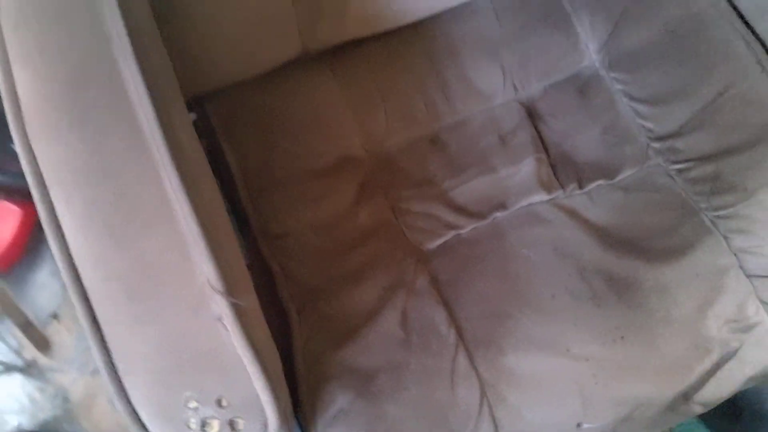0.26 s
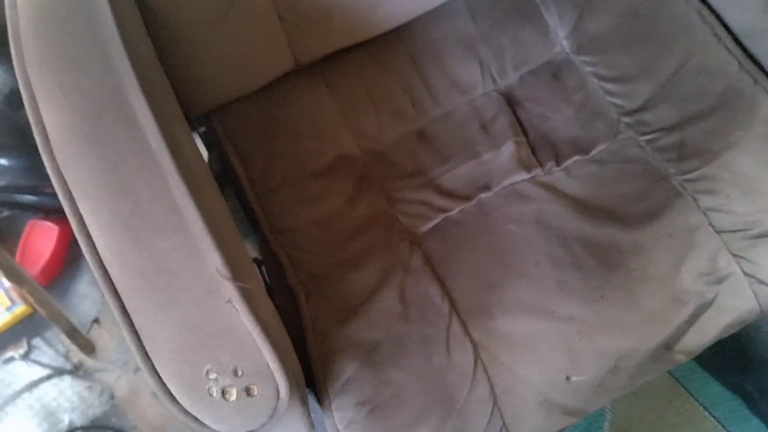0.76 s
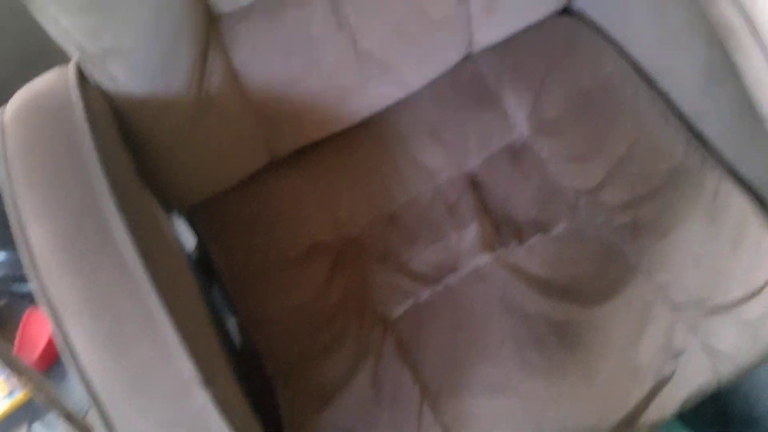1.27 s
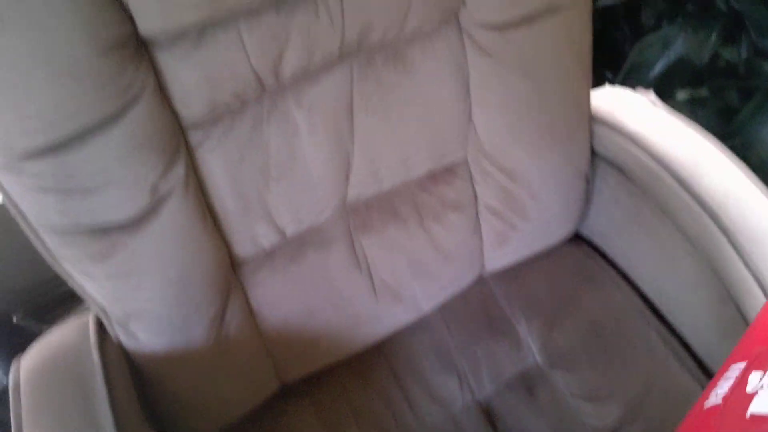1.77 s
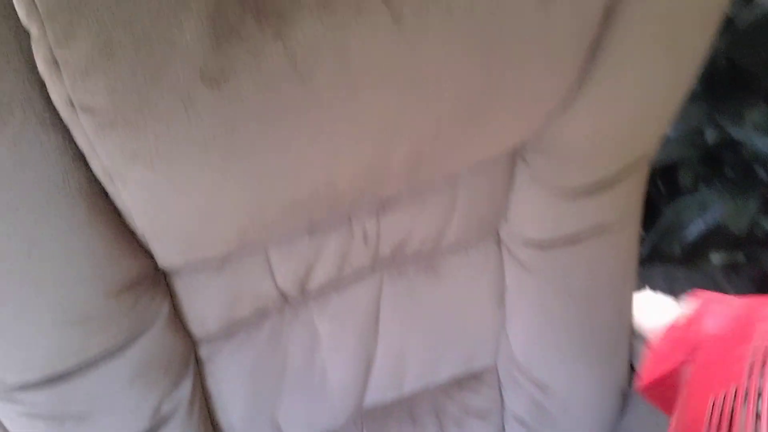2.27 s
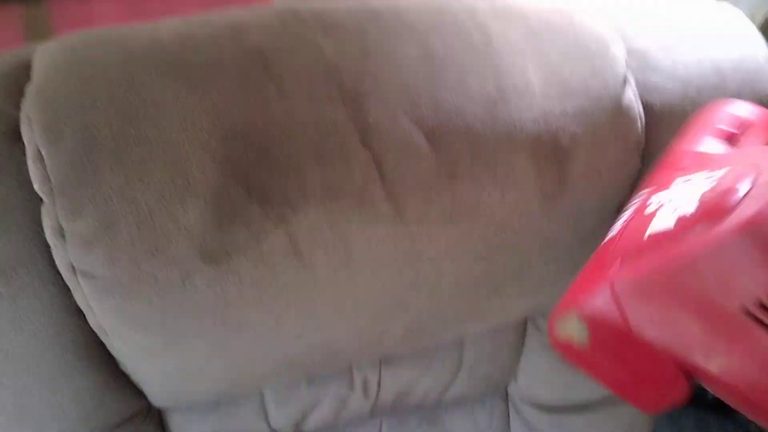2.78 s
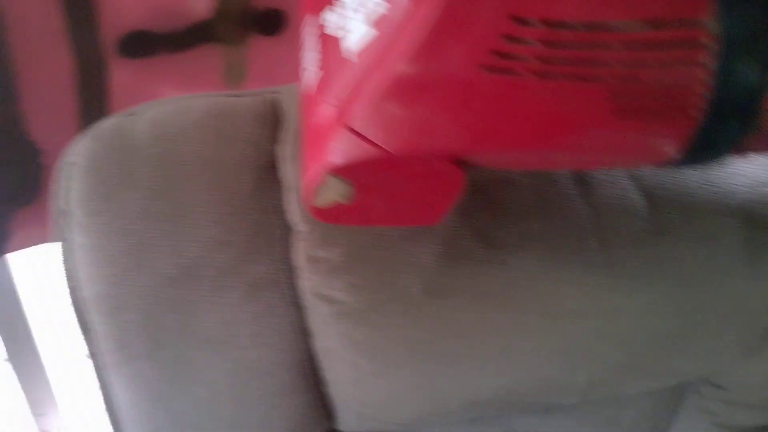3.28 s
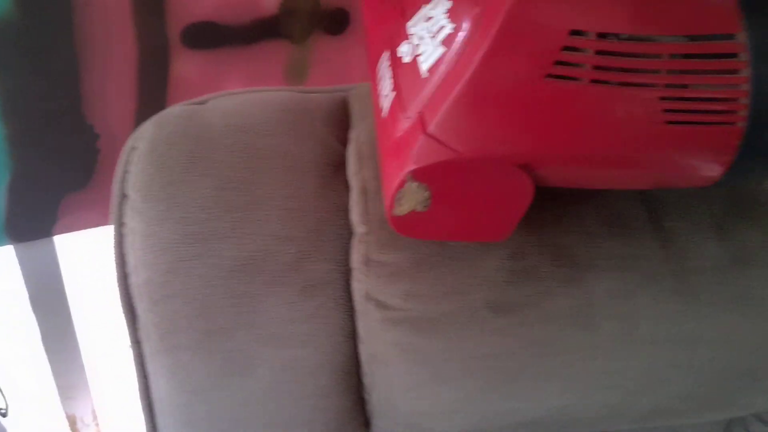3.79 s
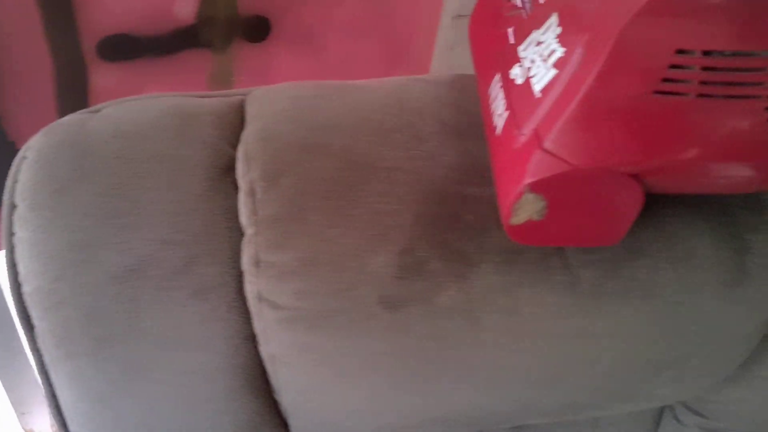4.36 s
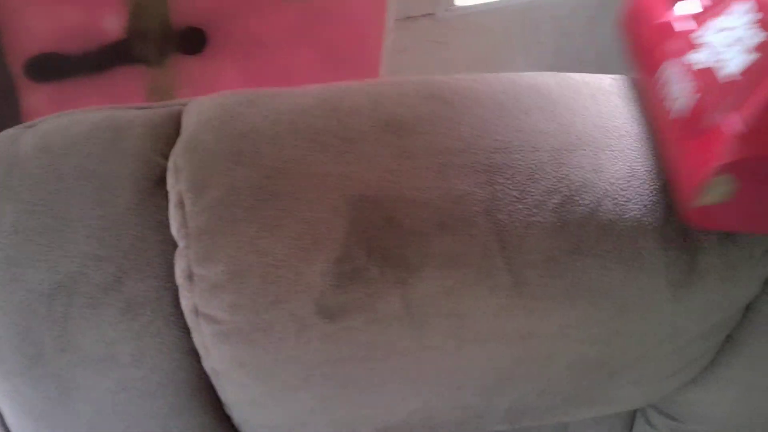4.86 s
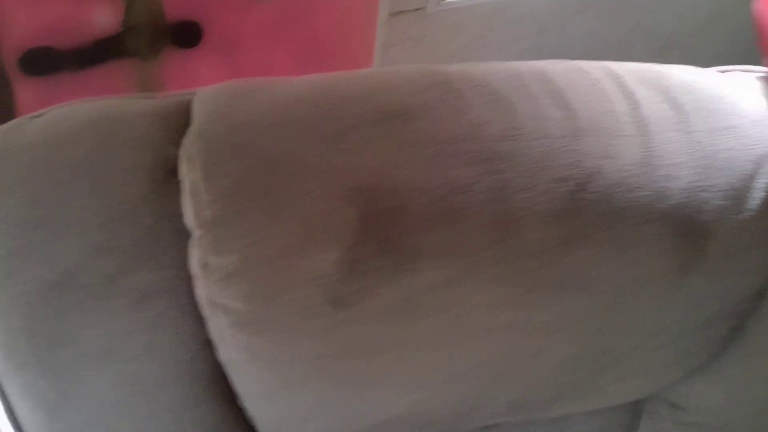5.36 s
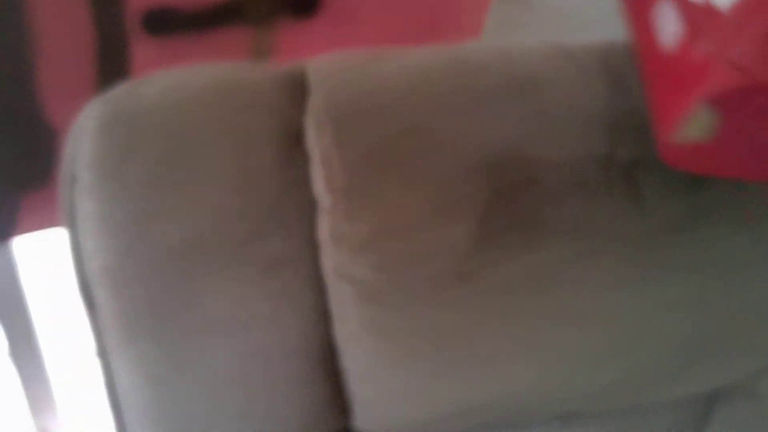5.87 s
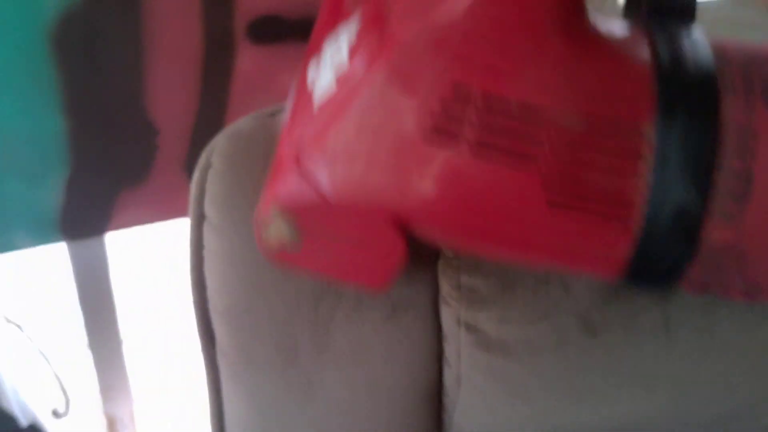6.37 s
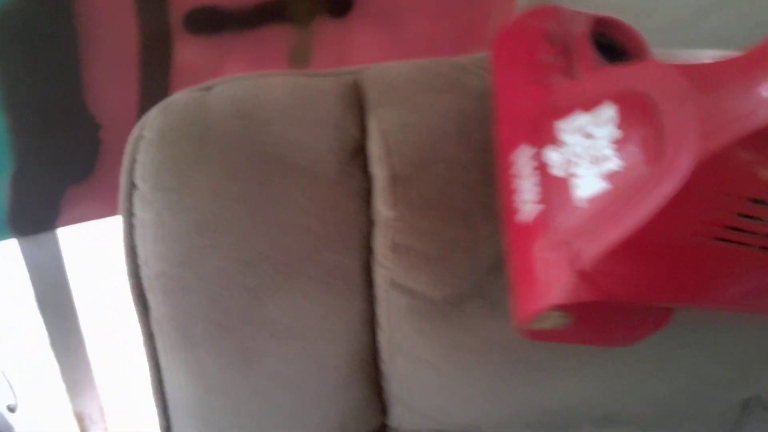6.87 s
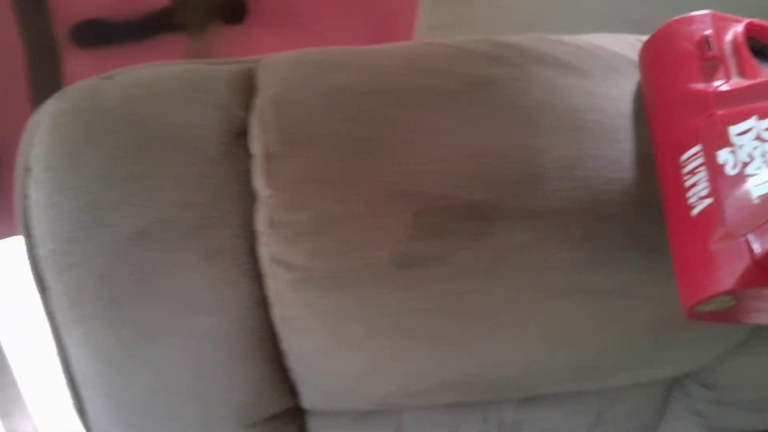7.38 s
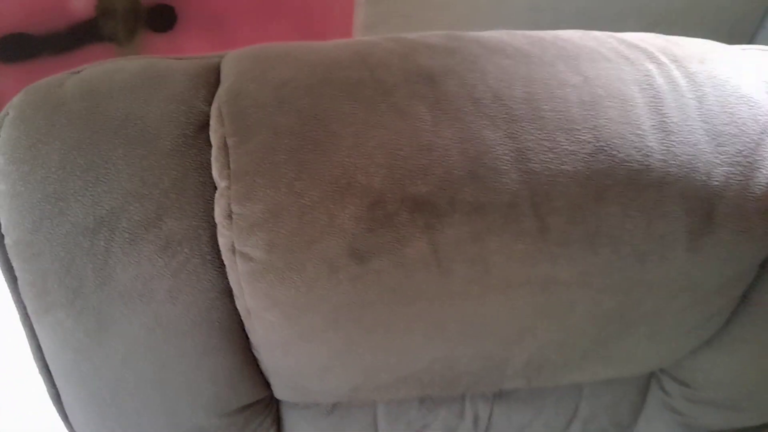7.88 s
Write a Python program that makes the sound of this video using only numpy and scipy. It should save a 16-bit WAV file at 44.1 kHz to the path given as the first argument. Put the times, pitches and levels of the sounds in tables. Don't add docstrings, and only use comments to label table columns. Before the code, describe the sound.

Close stereo sound of a little vacuum sweeping an upholstered chair. The steady high electric whine, with fainter motor tones around it, shimmers and drops out briefly as reflections change. Beneath are casing roar and suction, above them bright exhaust hiss. Faint hollow resonances glide early on; later the nozzle presses on padding, with muffled roar and a low frame rumble, until it recedes.

```python
import sys
import numpy as np
from scipy import signal
from scipy.io import wavfile
from scipy.ndimage import uniform_filter1d, map_coordinates

SR = 44100
rng = np.random.default_rng(int(sys.argv[2]) if len(sys.argv) > 2 else 0)


def nominal_scale(level):
    x = np.asarray(level, float) / 20
    return 10 ** x


def materialize(psi):
    bounded = np.clip(np.atleast_2d(psi).T, -1, 1)
    quanta = np.round(bounded * 32767).astype(np.int16)
    wavfile.write(sys.argv[1], SR, quanta)


N = 358974
TIME = np.arange(N) / SR
STEP = 64

# t/s, f/Hz
SHAFT_SPEED = [(0, 348.2), (.5, 349.2), (1.07, 349.85), (1.43, 349.25), (2.05, 349.7), (2.41, 349.2),
               (2.55, 350.05), (3.5, 349.55), (4.08, 348.1), (4.85, 348.3), (5.25, 346.7), (5.57, 348.5),
               (5.85, 346.9), (6.17, 348.3), (6.77, 348.6), (7.1, 347.75), (7.79, 347.65), (8.14, 346.9)]
# t/s, lead of the left microphone/samples, nearness/dB, nozzle opening/dB, cushion pressure/0-1
SWEEP = [(0, 6.2, 2.5, 5, 0.2), (.3, 10.2, -3.5, -4.5, .1), (.5, 15, -5.5, 0, 0),
         (.88, 17.3, -4.5, -1.3, .2), (1.43, 12.7, -4, 2.5, 0), (2.09, 10.7, -1.2, -1, 0.2),
         (2.5, 6.7, -0.2, -1, 0.2), (3, 11.8, 2.5, -2, 0.4), (3.48, 2.24, 2, 5, 0.68),
         (3.8, 4.83, 1.1, 2.5, .95), (4.75, 8.13, -0.2, -3.5, 0.93), (5.3, 15, -1.8, -2, 0.34),
         (6, 11.26, 0.5, 1.3, 0.84), (6.35, 2.53, 1.5, 2.5, 0.9), (6.52, 2.5, 1.5, -0.5, 0.84),
         (6.64, 5, 2, 2, .95), (7.15, 10.7, -0.5, -0.5, 0.68), (8.14, 13, -3.5, -4, 0.3)]
# t/s, left level/dB, right level/dB, extra lead by reflections/samples
WHINE = [(0, -32, -32, .8), (.22, -19.5, -22.5, 0.61), (.45, -20, -31, -0.2), (.9, -27, -28, -0.23),
         (1.27, -18, -30.5, -0.61), (1.74, -14.5, -33, 0.2), (2.21, -17.5, -22.5, 0.55),
         (2.7, -22, -22.5, 1), (2.86, -15.5, -29, .2), (3.4, -15.5, -24, -1.1), (4.13, -18, -23.5, -0.92),
         (4.61, -16.5, -25, -0.0047), (5.3, -17.5, -32.5, 0.02), (5.75, -20, -34.5, -0.47),
         (6.35, -17, -19.5, 0.12), (6.9, -16, -38, -0.67), (7.6, -23, -28, 1), (8.14, -33, -46, 0.52)]
# t/s, half length/s, left level/dB, right level/dB
WHINE_NULLS = [(.04, 0.034, -12, -14), (.35, 0.037, -8, -2), (.49, .04, 0, -5), (.67, 0.039, -6, -9),
               (.81, .03, -9, -4), (1.02, 0.036, -8, -1), (1.1, .04, 1, -5), (1.53, 0.14, -11.5, 0),
               (1.93, .12, -5.5, 0), (2.4, 0.085, -12, -11), (2.53, 0.053, -13, -1),
               (2.62, 0.046, -0.5, -20), (3, 0.063, -1, -24), (3.14, .06, -1, -8), (3.35, .03, 0.5, -5),
               (3.63, 0.14, -8, -14), (4.61, 0.14, 0.5, -8), (4.95, 0.027, 1, -2), (5.14, 0.11, -3, -18),
               (5.49, .05, -0.5, -15), (5.64, .05, -2.5, 2), (5.92, 0.035, -4, 2), (6.13, 0.068, -2, -3),
               (6.54, 0.075, -4.5, 7), (6.85, 0.033, -0.5, -13), (7.28, 0.11, -5, -11),
               (7.78, .05, -2, -10), (7.93, 0.075, 1, -14)]
# shaft multiple, left level/dB, right level/dB, scattered share
COMPANIONS = [(25, -28.5, -36.5, 0.36), (17, -32.5, -50.5, 0.3), (10, -36.5, -43.5, 0.093),
              (11, -39.5, -52.5, 0.36), (15, -42.5, -44.5, 0.34), (18, -41, -45.5, .3),
              (36, -40, -51, 0.51), (1, -51.5, -51, 0.15), (2, -53.5, -48, 0.21), (3, -49.5, -50, 0.46)]
STRONG_GLINTS = {25: [(.2, 0.18, -12, 9.5), (1, 0.17, -7, 3), (1.85, .2, -16, 3), (2.67, .25, -7, 10),
                 (3.3, 0.068, -7, 3), (5.35, 0.28, -4, 5), (6.3, 0.18, 2, 12), (7, 0.069, -25, -11),
                 (7.44, 0.08, -23, -10)], 17: [(.6, 0.55, -1, 3), (1.35, 0.22, 2.5, 16),
                 (1.9, 0.18, -2, -9), (2.6, 0.55, 1, 8), (5.6, 0.38, -8.5, -9), (7.25, 0.19, 0, 6),
                 (7.6, 0.27, -12, 12)]}
WEAK_GLINTS = {15: [(1.6, .5, -11, 4), (4.6, 0.42, 4, -4.5), (7, .6, 5.5, 4)], 18: [(1.7, 0.43, -3, 2),
               (6.6, 0.5, 5.5, -11)], 36: [(4.5, 1, -5, -10), (7.5, 0.45, 5, -2)],
               10: [(1.2, 0.24, -18, -11), (2.5, 0.29, -9, 9), (4.4, 0.38, 5, 3), (6.1, 0.075, 3, 11)],
               11: [(1.97, 0.17, 4.5, -7), (2.6, 0.12, -2, 16), (4.3, 0.78, -9, 15), (5.44, 0.41, -2, 4)],
               1: [(2.3, 0.65, 9.4, 6.8)], 2: [(2.2, 0.25, 13, 10.5), (3.03, 0.16, 3, -7),
               (6.3, 0.21, 3, 8)], 3: [(2.3, 0.19, -3, -3), (5.3, 0.1, -1, 8), (5.76, 0.17, 9, 9),
               (7.4, 0.36, -3, -22)]}
# shaft multiple, left level/dB, right level/dB
FAINT_ORDERS = [(5, -46, -48), (7, -50, -51), (8, -49, -49), (9, -47, -47), (12, -53, -55), (13, -52, -54),
                (14, -54, -56), (21, -51, -54), (22, -48, -52), (16, -47, -53), (20, -45, -47),
                (23, -44, -47), (24, -44, -47), (26, -43, -48), (28, -43, -53), (29, -37, -48),
                (30, -50, -58), (32, -48, -55), (33, -53, -59), (34, -50, -58), (37, -55, -62),
                (38, -64, -70)]
AIR_LAYERS = {"casing": (-39, 0.43, -1, 0.17), "nozzle": (-38, 1.04, -4, 0.34),
              "rush": (-30, 0.98, -1.5, 0.33), "hiss": (-27, 0.88, -1, .5)}
# f/Hz, level/dB
CASING_COLOUR = [(150, -42), (230, -13.5), (300, -3), (470, -0.5), (580, -3), (700, -9.5), (900, -58)]
# f/Hz, level/dB
NOZZLE_COLOUR = [(400, -67), (560, -13.5), (680, 2.5), (880, 5), (1000, 1.5), (1150, -4.5), (1350, -9),
                 (1600, -54)]
# f/Hz, level/dB
RUSH_COLOUR = [(800, -59), (1050, -10), (1250, -2), (1550, 0), (1900, -1.5), (2200, -0.5), (2900, -3.5),
               (3600, -1), (4700, -4), (5500, -3), (6300, -4.5), (7000, -11), (8500, -50)]
# f/Hz, level/dB
HISS_COLOUR = [(5000, -60), (6300, -14), (7000, -7), (7900, -3), (8800, 0), (9500, 0), (10200, -4),
               (10900, -11), (11600, -17), (12500, -21), (14300, -27), (16000, -45)]
MUFFLE_DB = [-3.5, -7.5]
# f/Hz, level/dB
CHAIR_COLOUR = [(30, -30), (60, -23), (90, -8), (125, -2), (200, 1), (260, -1), (340, -29)]
# f/Hz, level/dB
HANDLING_COLOUR = [(4, 19), (15, -2), (28, -27), (60, -27), (120, -50)]
# t/s, half length/s, f/Hz, glide/Hz per s, level/dB
HOLLOWS = [
    (0.87, 0.55, 950, -80.5, -36.5),
    (1.5, 0.32, 520, 26.5, -41.5),
    (2.3, 0.2, 860, -41, -40),
    (0.3, 0.16, 460, -50, -42.5),
    (7.3, 0.32, 150, 5, -55),
]


def unit(x):
    return x / np.sqrt(np.mean(x ** 2, axis=-1, keepdims=True) + 1e-20)


def curves(rows):
    s, *columns = np.transpose(rows)
    return np.array([np.interp(TIME, s, column) for column in columns])


def bumps(rows):
    s, half, *db = np.transpose(rows)
    coarse = TIME[::STEP]
    bells = np.exp(-((coarse - s[:, None]) / half[:, None]) ** 2)
    return np.array([np.interp(TIME, coarse, row) for row in db @ bells])


def wobble(rate, count):
    at = np.arange(N // STEP + 1) * STEP * rate / SR
    knots = rng.standard_normal((count, int(N * rate / SR) + 4))
    smooth = [map_coordinates(row, [at], np.float32) for row in knots]
    return np.repeat(smooth, STEP, axis=1)[:, :N]


def coloured(points, patchy_db, channels):
    noise = rng.standard_normal((channels, N), dtype=np.float32)
    hz, _, z = signal.stft(noise, SR, nperseg=2048)
    patches = uniform_filter1d(rng.standard_normal(z.shape[1:]), 9, 0)
    patches = uniform_filter1d(patches, 16, 1)
    f, db = np.transpose(points)
    colour_db = np.interp(np.log(hz + 1), np.log(f + 1), db, right=-120)
    gain = nominal_scale(colour_db[:, None] + patchy_db * patches / patches.std())
    return unit(signal.istft(z * gain, SR, nperseg=2048)[1][:, :N])


def late(x, samples):
    return map_coordinates(x, [np.arange(N) - samples], order=3, mode="mirror")


def motor(shaft_hz, lead, near_db):
    turns = np.cumsum(shaft_hz + 0.046 * wobble(30, count=1)[0]) / SR
    turns_per_sample = (shaft_hz / SR).astype(np.float32)

    def tone(multiple, level_db, fade, rate, lead=lead.astype(np.float32)):
        left = ((multiple * turns + rng.random()) % 1).astype(np.float32)
        right = left - multiple * turns_per_sample * lead
        angle = np.float32(2 * np.pi) * np.array([left, right], np.float32)
        scatter = np.float32(fade) * wobble(rate, count=4)
        swaying = (1 + scatter[:2]) * np.cos(angle) + scatter[2:] * np.sin(angle)
        return np.float32(np.sqrt(2) * nominal_scale(level_db)) * swaying

    *whine_db, detour = curves(WHINE)
    sound = tone(27, whine_db + bumps(WHINE_NULLS) + 0.5, 0.17, 11, lead + detour)
    glints = {**STRONG_GLINTS, **WEAK_GLINTS}
    for multiple, left_db, right_db, fade in COMPANIONS:
        level_db = np.array([[left_db], [right_db]]) + 0.54 * near_db + bumps(glints[round(multiple)])
        sound += tone(round(multiple), level_db, fade, 11)
    for multiple, left_db, right_db in FAINT_ORDERS:
        lift_db = 0.7 * max(multiple - 29, 0) - 0.3
        sound += tone(round(multiple), [[left_db + lift_db], [right_db + lift_db]], 0.45, 6)
    return sound


def air(points, level_db, lead, direct, bounce, patchy_db):
    source, left_room, right_room = coloured(points, patchy_db, channels=3)
    echo = bounce * np.array([np.roll(source, 130), np.roll(source, 122)])
    straight = np.array([source, late(source, lead)])
    room = np.array([left_room, right_room])
    return nominal_scale(level_db) * unit(np.sqrt(direct) * (straight + echo) + np.sqrt(1 - direct) * room)


def shaded(x, pressure):
    band_filter = signal.butter(2, [3300, 4900], "band", fs=SR, output="sos")
    band = signal.sosfiltfilt(band_filter, x)
    return x + (nominal_scale(-6.5 * pressure) - 1) * band


def airflow(lead, near_db, open_db, pressure):
    def ports(name):
        db, share, centre_db, lean_db = AIR_LAYERS[name]
        return db + share * near_db + np.outer([0.5, -0.5], centre_db + lean_db * lead)

    nozzle_lead = 1.22 * lead - 6
    casing_db = ports("casing") + np.outer(MUFFLE_DB, pressure)
    casing = air(CASING_COLOUR, casing_db, lead, direct=0.82, bounce=0.089, patchy_db=1.63)
    nozzle_db = ports("nozzle") + open_db
    nozzle = air(NOZZLE_COLOUR, nozzle_db, nozzle_lead, direct=0.65, bounce=0.024, patchy_db=2.0)
    rush = air(RUSH_COLOUR, ports("rush"), lead, direct=0.39, bounce=0.35, patchy_db=2.5)
    hiss = air(HISS_COLOUR, ports("hiss"), lead, direct=0.28, bounce=0.59, patchy_db=4.0)
    return casing + nozzle + shaded(rush, pressure) + hiss


def chair(lead, pressure):
    return air(CHAIR_COLOUR, -58.5 + 7 * pressure, lead, direct=0.98, bounce=0, patchy_db=1.0)


def handling():
    lumps_db = 2.5 * wobble(4, count=2)
    rumble = coloured(HANDLING_COLOUR, patchy_db=1.5, channels=2)
    return nominal_scale(-52 + np.array([[-1.5], [-5.5]]) + lumps_db) * rumble


def hollows(lead):
    sharpness = 9
    sound = 0
    for s, half, hz, glide, db in HOLLOWS:
        since = TIME - s
        heard = since - np.outer([0, 1], lead) / SR
        angle = 2 * np.pi * (hz + glide * since / 2) * heard
        a, b = wobble(hz / sharpness, count=2)
        swell = nominal_scale(db) * np.exp(-(since / half) ** 2)
        sound = sound + swell * (a * np.cos(angle) + b * np.sin(angle))
    return sound


def scene():
    shaft_hz, = curves(SHAFT_SPEED)
    lead, near_db, open_db, pressure = curves(SWEEP)
    cleaner = motor(shaft_hz, lead, near_db) + airflow(lead, near_db, open_db, pressure)
    return cleaner + chair(lead, pressure) + handling() + hollows(lead)


def top_cut(x):
    return signal.sosfilt(signal.butter(12, 14300, fs=SR, output="sos"), x)


def record(dry):
    return top_cut(dry)


dry = scene()
out = record(dry)
materialize(out)
```